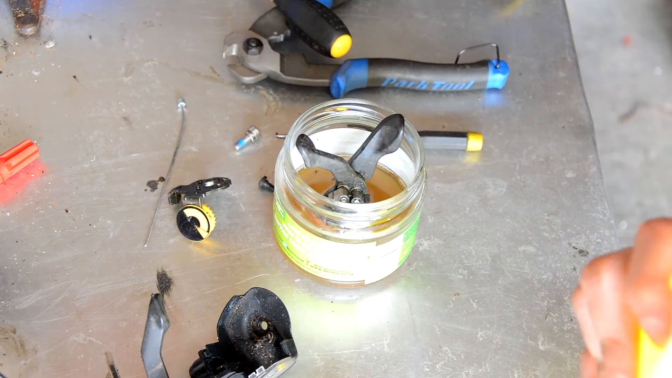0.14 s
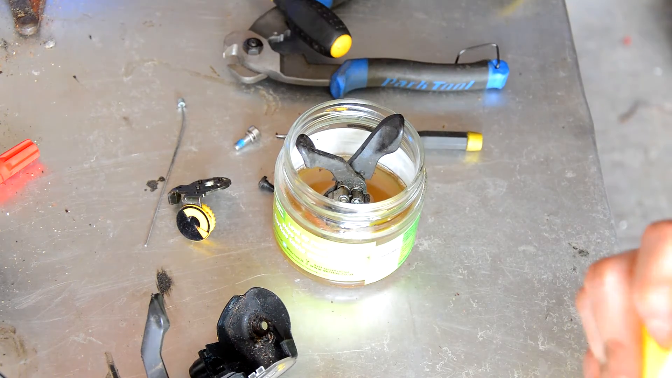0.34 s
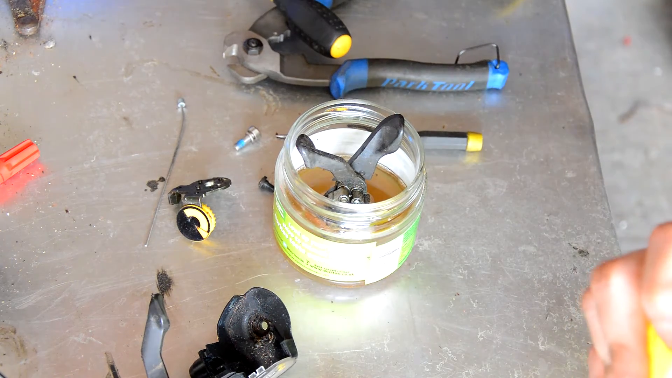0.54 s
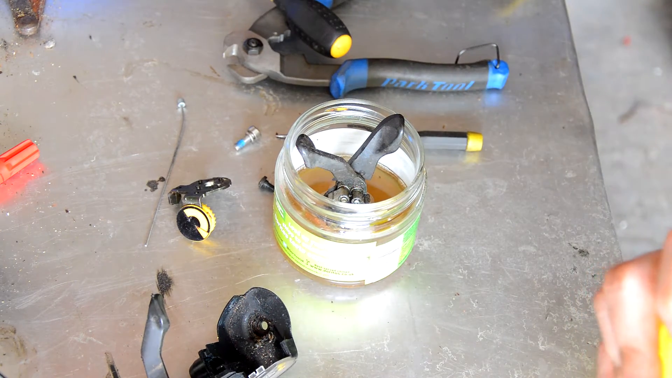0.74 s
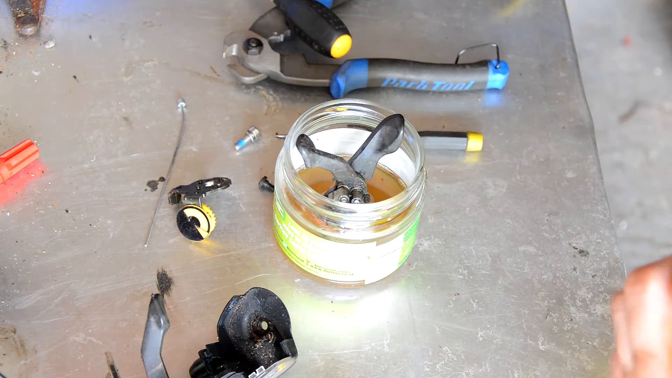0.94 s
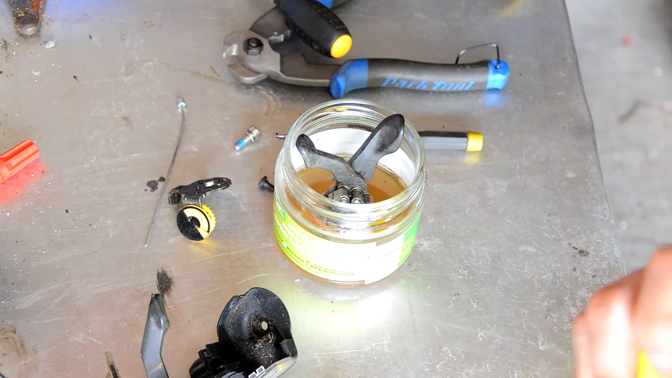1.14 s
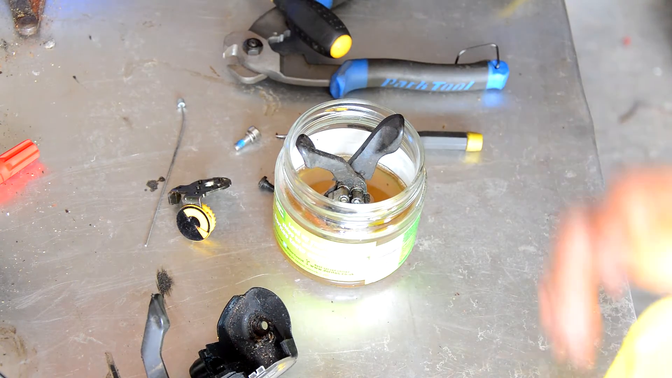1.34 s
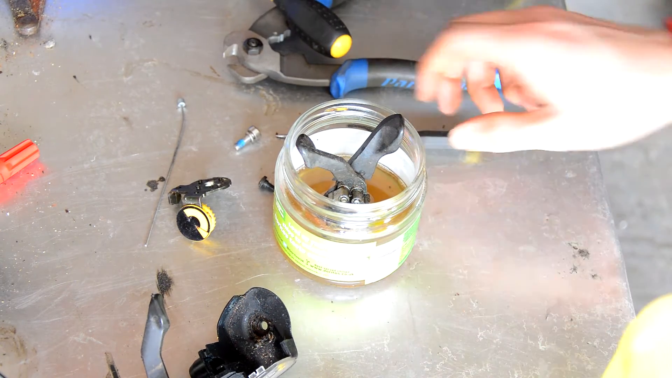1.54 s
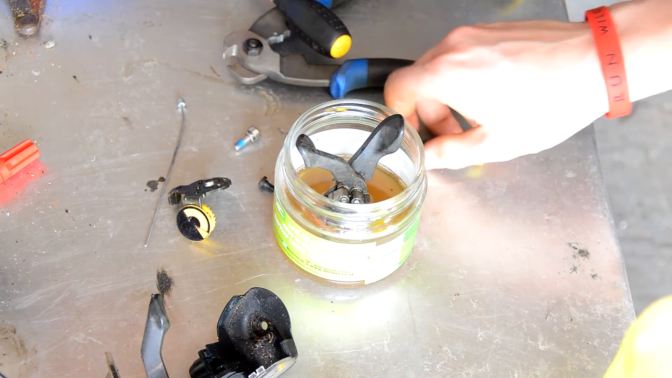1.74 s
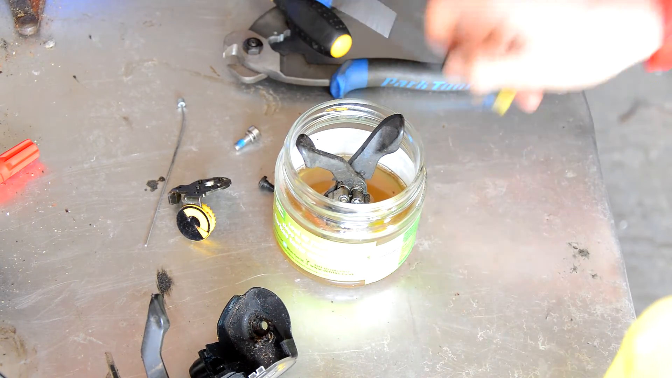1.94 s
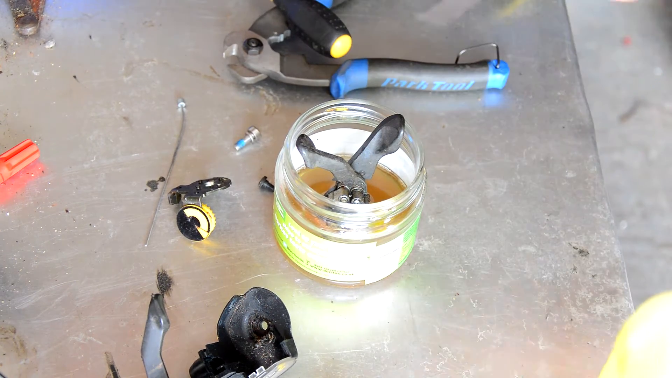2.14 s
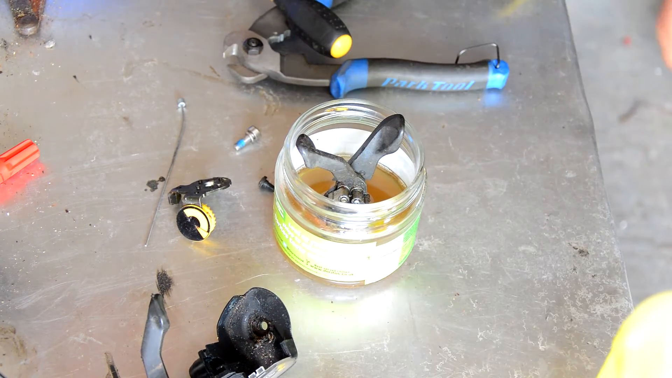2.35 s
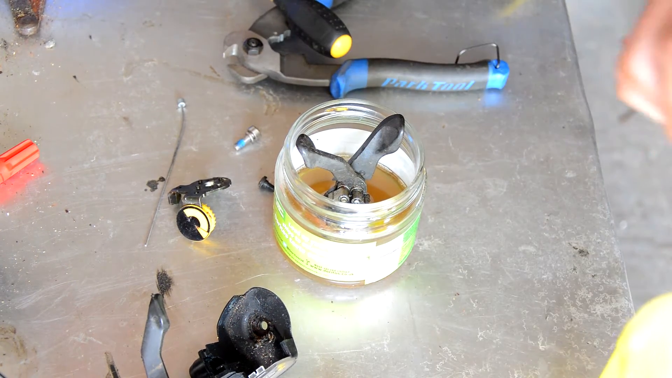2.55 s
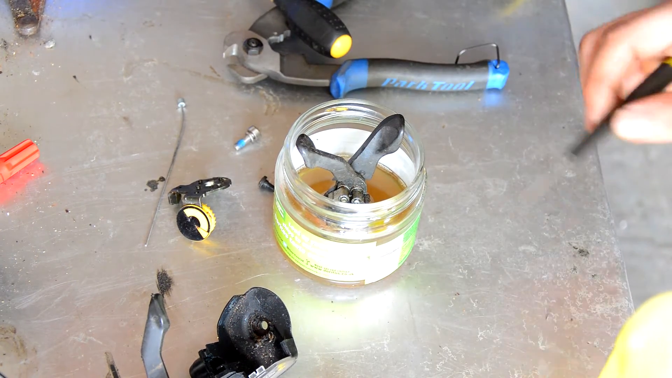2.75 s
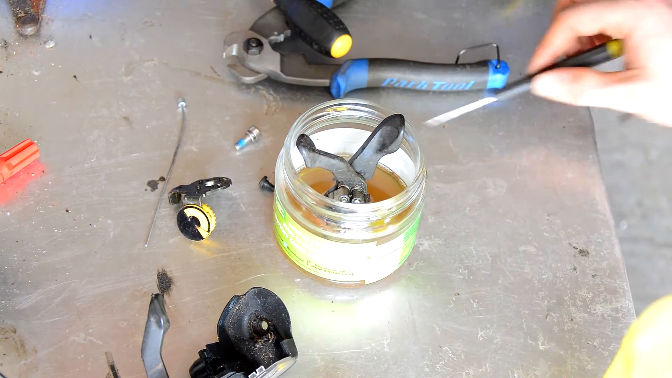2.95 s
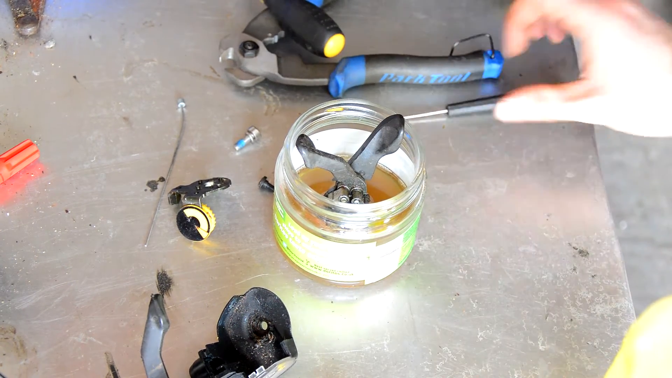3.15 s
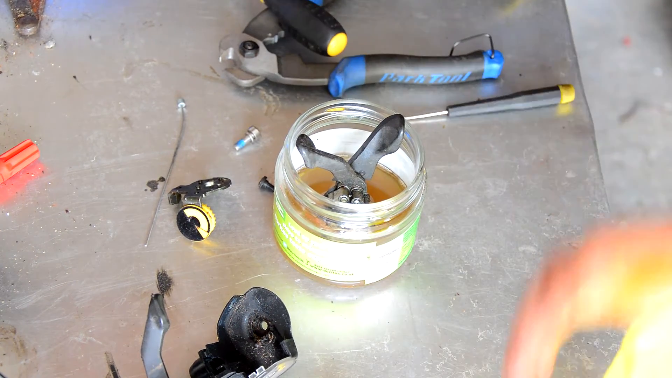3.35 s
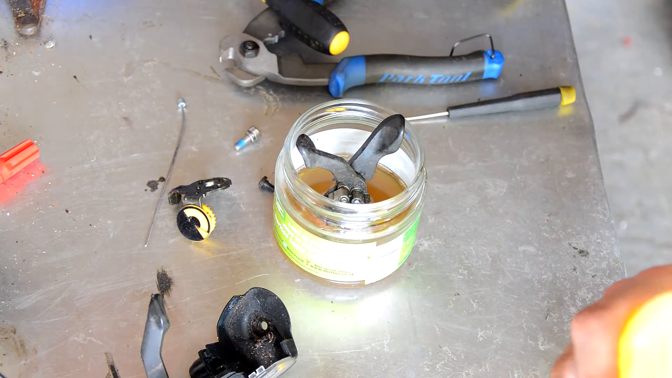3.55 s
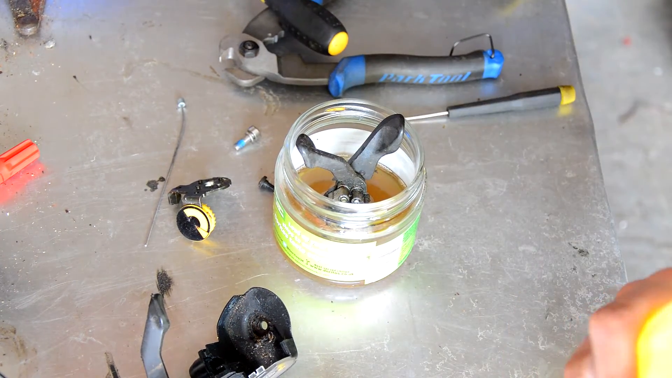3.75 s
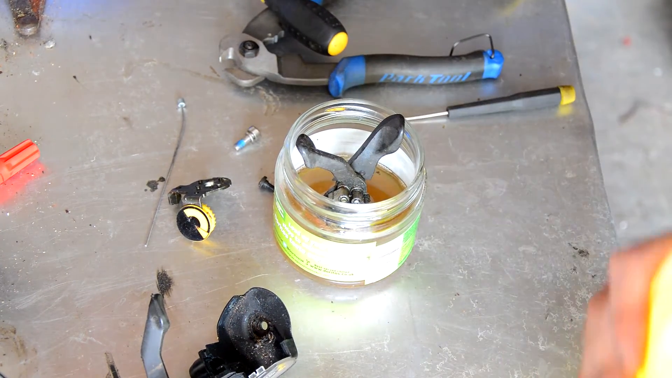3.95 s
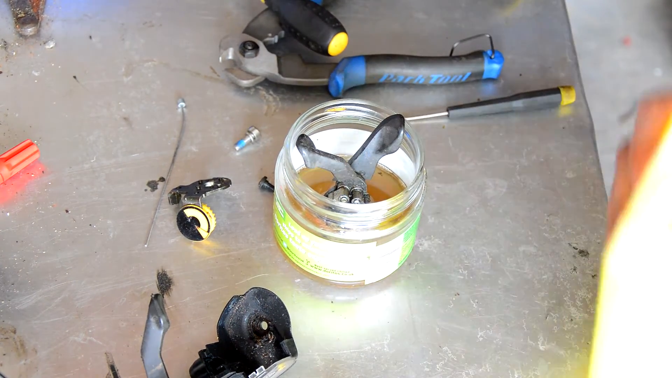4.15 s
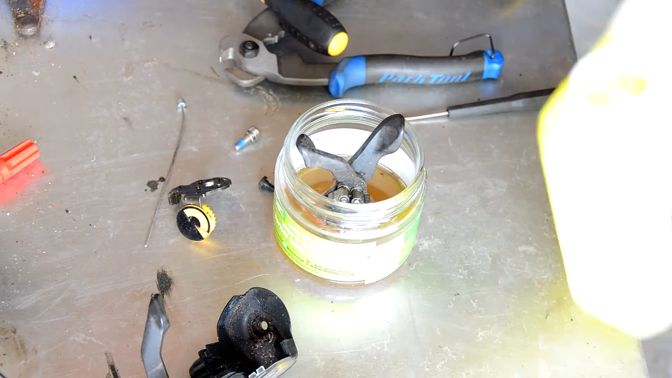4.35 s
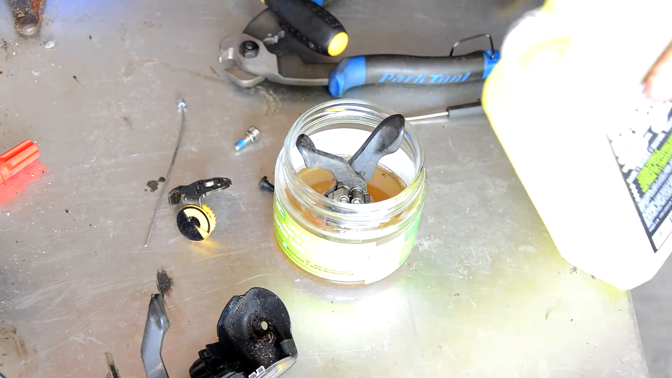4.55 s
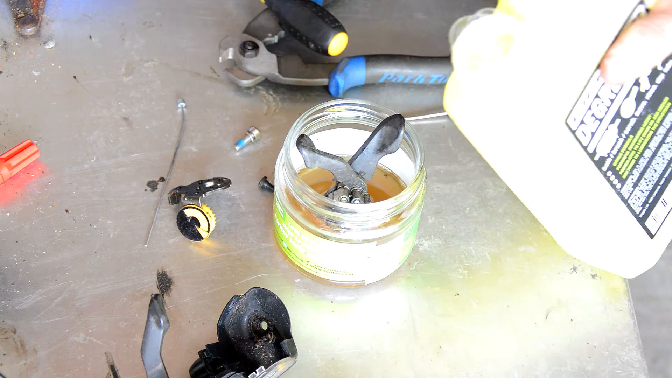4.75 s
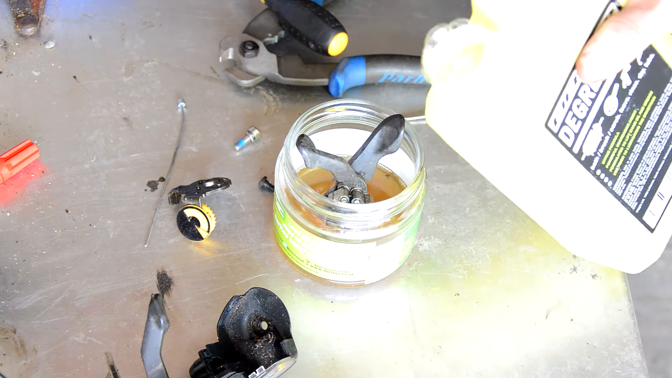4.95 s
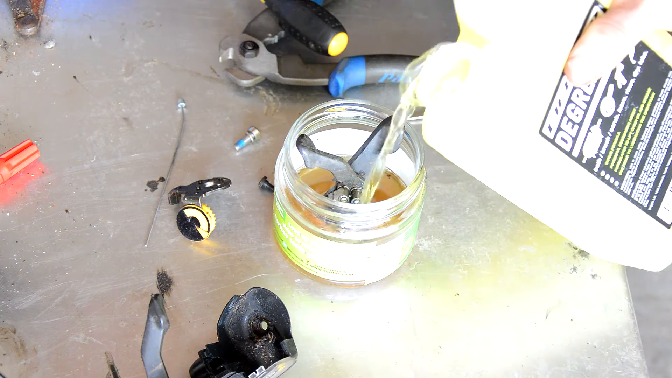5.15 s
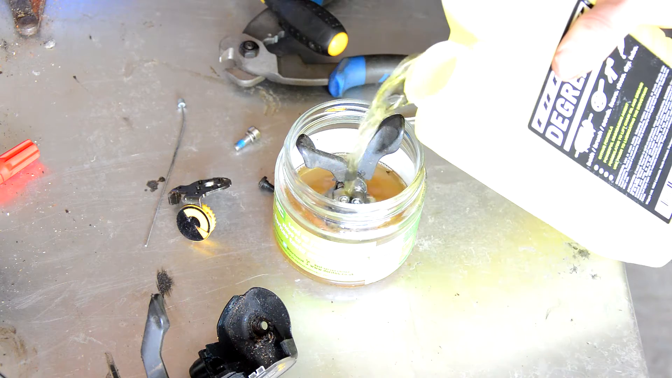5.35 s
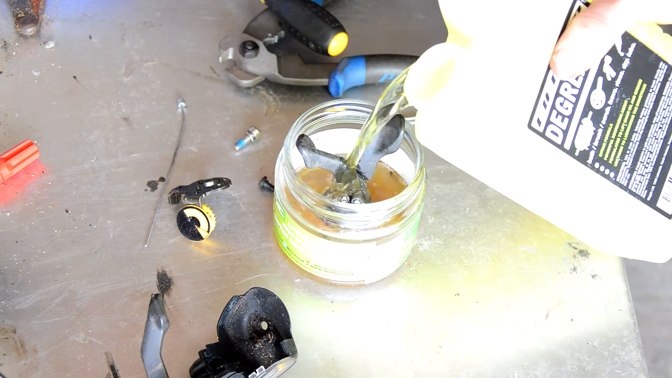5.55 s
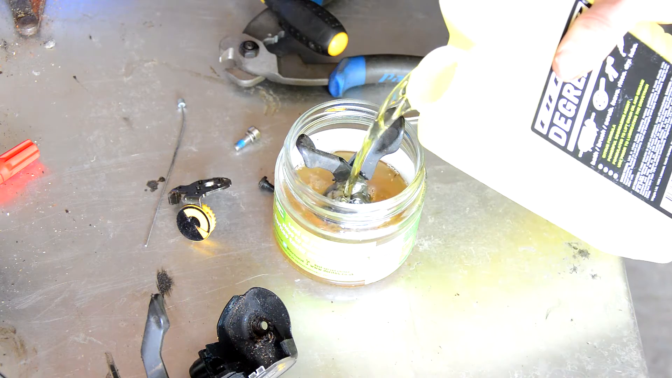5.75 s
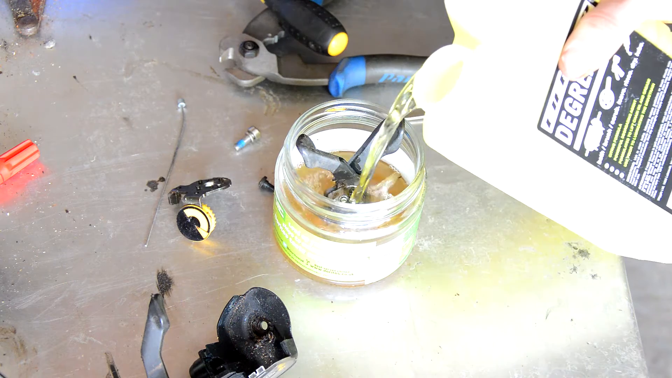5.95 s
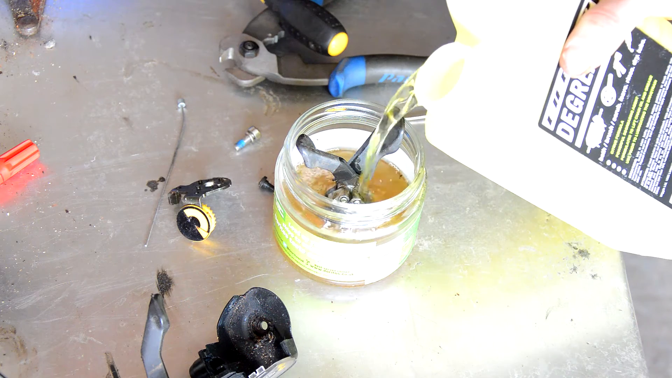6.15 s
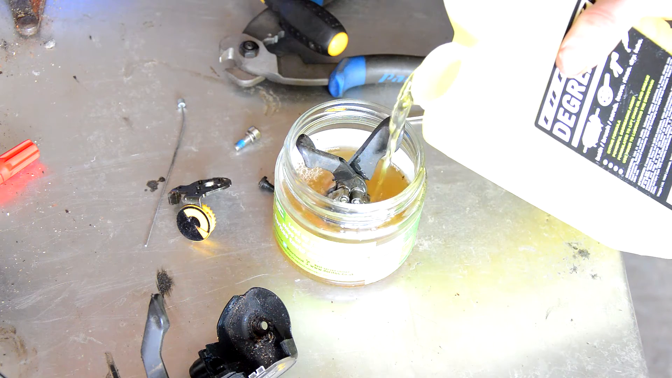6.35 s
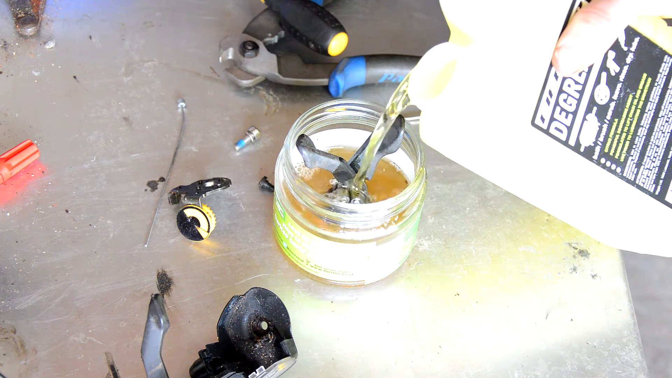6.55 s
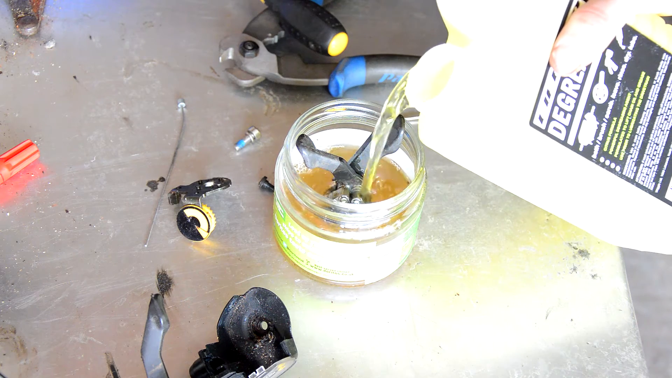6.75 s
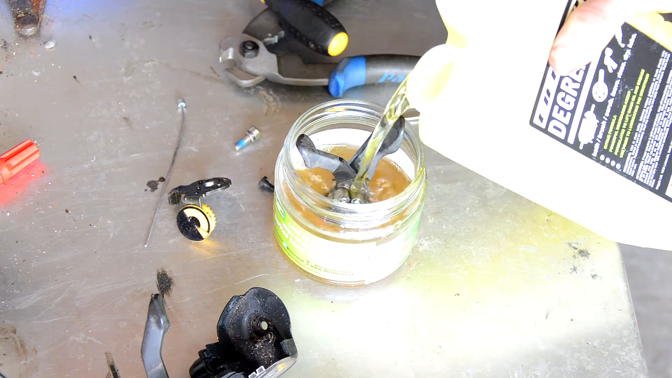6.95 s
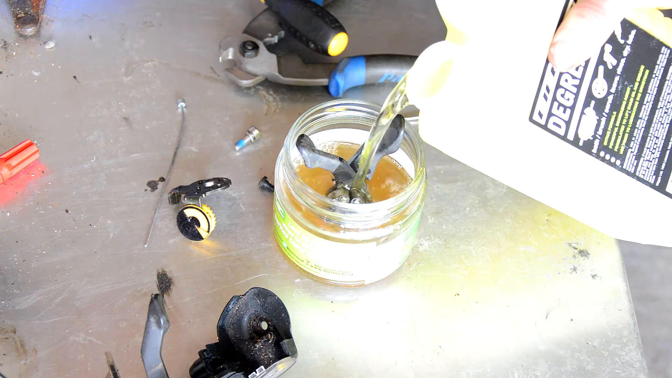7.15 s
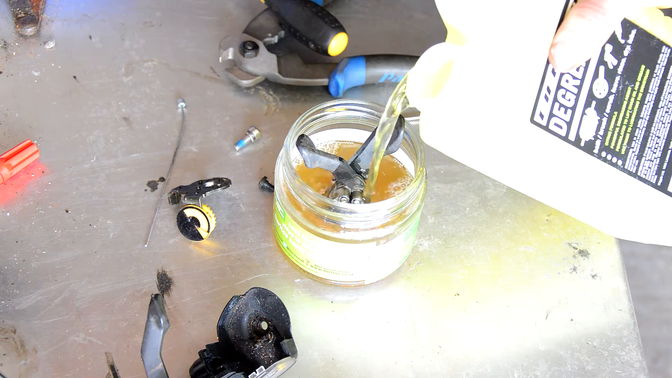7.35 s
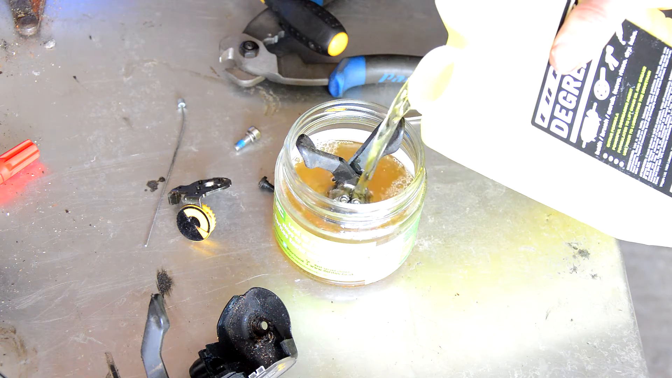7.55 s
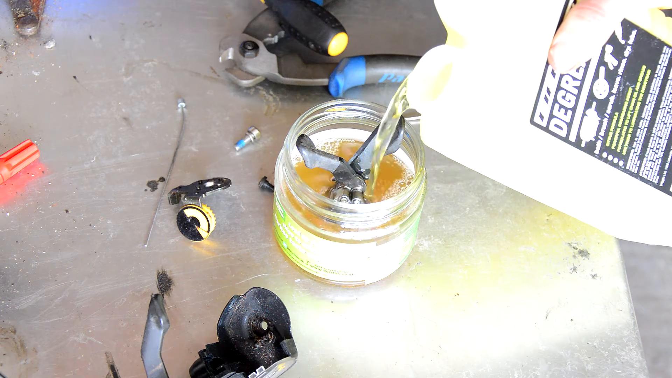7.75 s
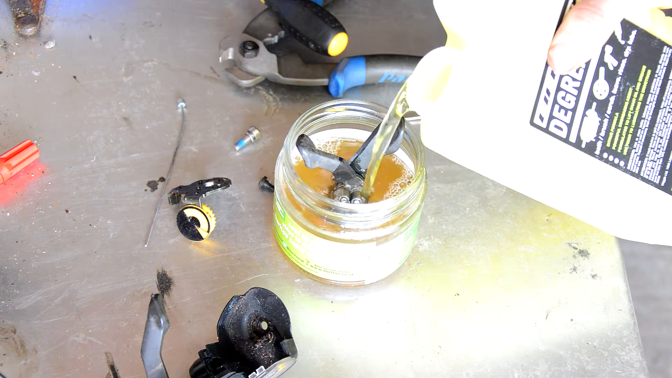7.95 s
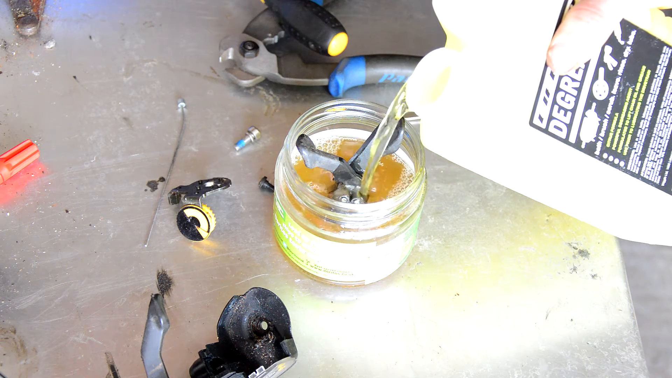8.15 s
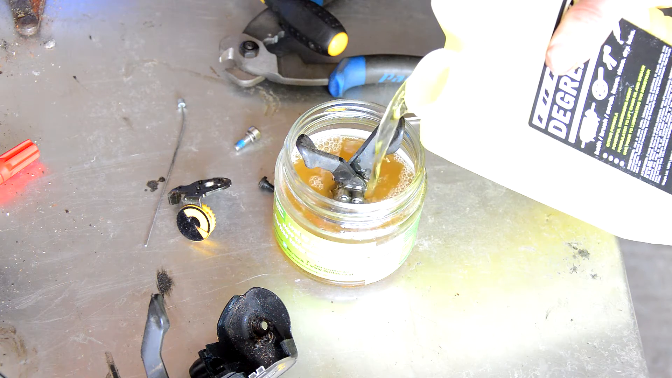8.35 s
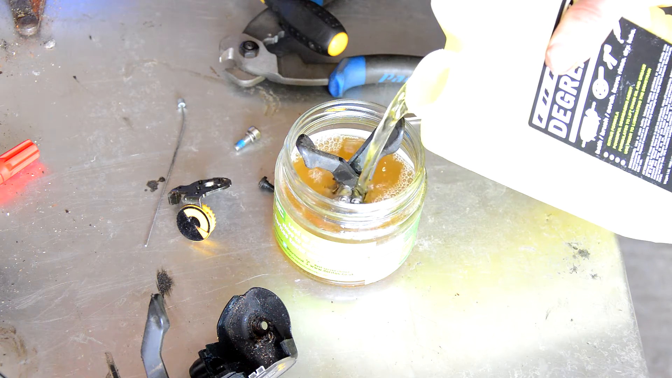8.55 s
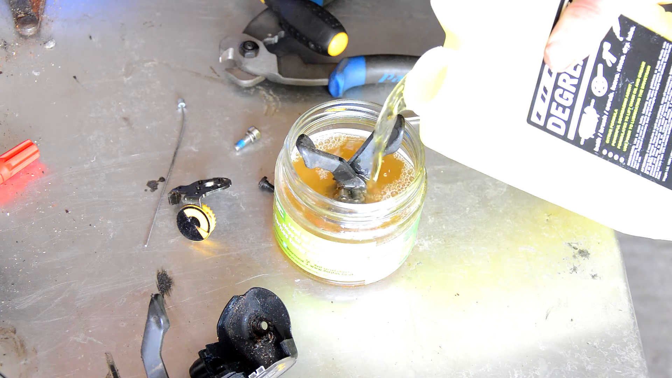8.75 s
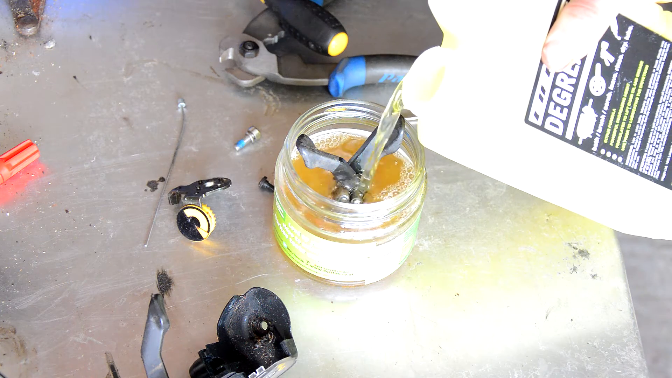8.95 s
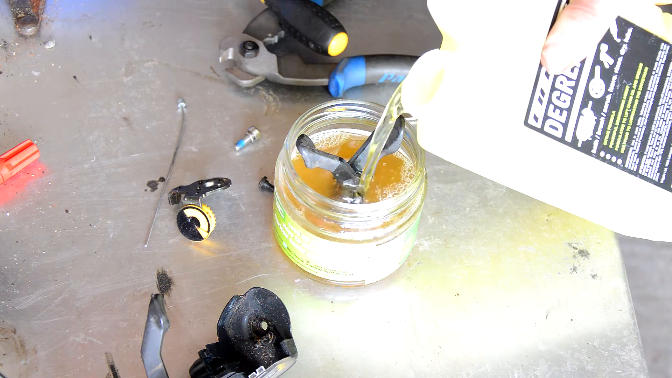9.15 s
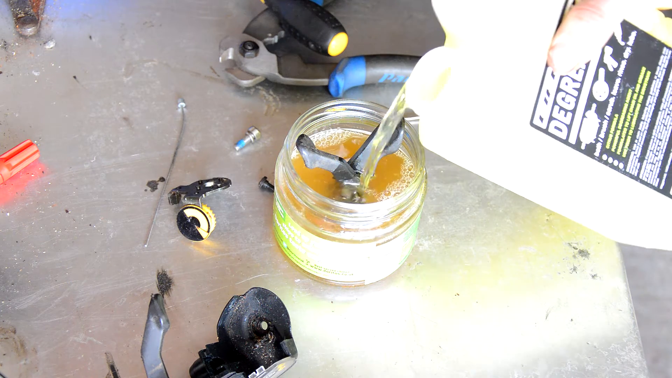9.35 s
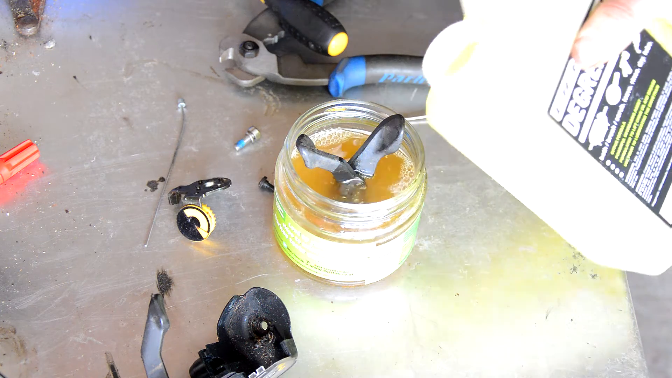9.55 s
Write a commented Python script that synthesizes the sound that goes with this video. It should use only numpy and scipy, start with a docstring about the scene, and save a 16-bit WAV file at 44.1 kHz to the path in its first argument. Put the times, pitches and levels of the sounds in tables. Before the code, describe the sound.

Gritty scuffs and ringing clacks of tools and a jug cap on a hard bench come first, a very loud knock among them, then lighter handling and another sharp double crack. The jug thuds softly, then a thin stream splashes into a small glass jar, crisp and bubbly, uneven, ending in plops. Close microphone, short room echo, quiet rumble and drone behind.

```python
"""Hands at a workbench unscrew a plastic jug and move small tools, close to the microphone; blows ring the bench.
They then pour liquid over metal parts into a glass jar, also close: splats throw spray, bubbles chirp, the jar pings
and all of it shakes the rings of the glass. Rubbing is noisy stick-slip grit, thuds are low sine swings.
Behind lies a quiet workshop: banded air noise, a thin whine, a dull rumble and a low drone that swells."""
import sys
import numpy as np
from scipy import signal
from scipy.io import wavfile
from scipy.ndimage import uniform_filter1d

SR = 44100
rng = np.random.default_rng(int(sys.argv[2]) if len(sys.argv) > 2 else 0)


def wav_out(sig):
    """Save sig, one row per channel (or a flat mono array), as 16-bit PCM at SR to the path in sys.argv[1]."""
    wavfile.write(sys.argv[1], SR, np.round(np.clip(np.atleast_2d(sig).T, -1, 1) * 32767).astype(np.int16))


N = 427329  # samples


def undb(db):
    """Amplitude factor of a level in dB."""
    return np.exp(np.asarray(db) * np.log(10) / 20)


def level(x, db):
    """Bring a signal to an rms level in dB."""
    return x * undb(db) / np.sqrt(np.mean(x ** 2))


def band(x, lo_hz, hi_hz):
    """Keep the sound between two frequencies."""
    sos = signal.butter(2, [lo_hz, min(hi_hz, .45 * SR)], "band", fs=SR, output="sos")
    return signal.sosfilt(sos, x)


def ring(x, hz, width_hz):
    """A resonance with gain 1 at its centre."""
    return signal.lfilter(*signal.iirpeak(hz, hz / width_hz, fs=SR), x)


def steep(x, hz, width_hz):
    """A resonance applied twice, the second wider, for dark valleys around it."""
    return ring(ring(x, hz, width_hz), hz, 2 * width_hz)


def curves(rows):
    """Straight lines over the whole scene through a table whose first column is time."""
    s, *columns = np.transpose(rows)
    return [np.interp(np.arange(N) / SR, s, c) for c in columns]


def add(out, s, x):
    """Mix a sound in at a time in seconds, cut at the end."""
    i = int(s * SR)
    out[i:i + len(x)] += x[:N - i]


def fade(t, t60):
    """Exponential decay that falls 60 dB in t60 seconds."""
    return np.exp(-np.log(1000) * t / t60)


def walk(rate):
    """Random levels held 1 / rate s and slewed twice."""
    k = int(SR / rate)
    held = np.repeat(rng.standard_normal(N // k + 1), k)
    return 0.58 * uniform_filter1d(uniform_filter1d(held, k), k)[:N]


# spectrum of the workshop air, relative: (frequency [Hz], density [dB per Hz])
AIR_SPECTRUM = [(15, -37), (25, -8), (105, 4), (157, 1), (292, -4), (404, -41), (462, -16), (1070, -5),
                (1320, -17.5), (1990, -13), (2400, -26), (2670, -25), (3700, -22.5), (14700, -36),
                (15900, -23)]
AIR_DB = -47.5  # rms of all air bands together
WHINE_HZ, WHINE_DB = 15721, -67.5  # peak level
WHISTLE_HZ, WHISTLE_WIDTH_HZ, WHISTLE_DB = 2693, 230, -65  # a faint steady band in the air noise


def shop():
    """Half-octave bands of air noise swell together and flicker alone, with a faint narrow band and a thin whine."""
    air, swell, points = 0, walk(0.69), np.array(AIR_SPECTRUM)
    for hz in 30 * 2 ** np.arange(0, 9.2, .5):
        density_db = np.interp(np.log(hz), np.log(points[:, 0]), points[:, 1])
        db = density_db + 1.0 * swell + 0.18 * walk(3.2)
        air = air + undb(db) * band(rng.standard_normal(N), hz / 2 ** 0.34, hz * 2 ** 0.19)
    whistle = level(steep(rng.standard_normal(N), WHISTLE_HZ, WHISTLE_WIDTH_HZ), WHISTLE_DB)
    electric_whine = undb(WHINE_DB) * np.sin(2 * np.pi * WHINE_HZ * np.arange(N) / SR)
    return level(air, AIR_DB) + whistle + electric_whine


# murky low-mid rumble, before a slight flicker: (time [s], level [dB])
RUMBLE_LEVELS = [(0.0, -43.5), (0.29, -53.5), (1.21, -53), (1.89, -48.5), (3.67, -53.5), (3.88, -48),
                 (4.34, -53.5), (4.67, -50), (5.02, -55), (5.94, -57), (6.45, -50), (7.34, -52),
                 (8.28, -55.5), (9.07, -59), (9.69, -59)]


def rumble():
    """A dull wash of low-mid noise under the drone that comes and goes."""
    wash = level(band(rng.standard_normal(N), 158, 454), 0)
    return undb(curves(RUMBLE_LEVELS)[0] + 0.66 * walk(5.6)) * wash


# low drone, rms before the wavering: (time [s], upper tone level [dB], lower tone level [dB])
DRONE_LEVELS = [(0.0, -40, -47), (0.13, -79, -53), (0.38, -85, -67), (1.97, -56.5, -47), (4.34, -60, -63.5),
                (4.5, -59, -74), (4.64, -57, -50), (4.91, -46, -73), (5.1, -53, -64), (5.53, -81, -55),
                (5.61, -55, -75), (5.67, -52, -81), (7.4, -39.5, -54), (7.64, -44, -48), (7.72, -42, -61),
                (8.07, -43.5, -51), (8.26, -41, -61), (8.83, -56.5, -58), (9.64, -48, -79),
                (9.69, -51, -66)]
UPPER_HZ, LOWER_HZ = 154, 80.3
UNDERTONE_HZ, UNDERTONE_DB = 136.8, -7  # beats against the upper tone; level against the upper tone's table
THRUM_HZ, THRUM_DB = 37.6, -62.5


def drone():
    """Low sine tones that waver in pitch and level, as from machinery beyond the walls."""
    upper_db, lower_db = curves(DRONE_LEVELS)
    # (level [dB], pitch [Hz], scale of the pitch wavering [Hz])
    tones = ((upper_db, UPPER_HZ, 1.2), (lower_db, LOWER_HZ, 2.3),
             (upper_db + UNDERTONE_DB, UNDERTONE_HZ, 5), (THRUM_DB, THRUM_HZ, 3))
    out = np.zeros(N)
    for db, hz, waver_hz in tones:
        loudness = np.sqrt(2) * undb(db + 6.8 * walk(12))
        out += loudness * np.sin(2 * np.pi * np.cumsum(hz + waver_hz * walk(57)) / SR)
    return out


# narrow hisses and squeaks, rms before their swell and fade:
# (middle [s], length [s], centre [Hz], level [dB])
HISS_EVENTS = [(.372, 0.038, 5000, -59), (.55, 0.34, 4900, -60.5), (.5, 0.41, 6600, -66),
               (3.084, 0.067, 2930, -35), (4.34, 0.091, 3280, -59), (5.105, 0.095, 4200, -55.5),
               (5.904, 0.11, 4200, -53), (7.783, 0.089, 3540, -57), (8.354, 0.063, 4940, -56)]
HISS_WIDTH_HZ = 390


def hisses():
    """Narrow bands of noise that swell and fade, unevenly."""
    out = np.zeros(N)
    for s, length_s, hz, db in HISS_EVENTS:
        k = int(length_s * SR)
        hiss = level(steep(rng.standard_normal(k), hz, HISS_WIDTH_HZ), db)
        add(out, s - length_s / 2, hiss * np.hanning(k) ** .5)
    return out * undb(4 * walk(45))


def bubble(hz, t60, rise):
    """A gas pocket rings and climbs in pitch as it nears the surface."""
    t = np.arange(int(t60 * SR) + 8) / SR
    tone = np.sin(2 * np.pi * hz * t * (1 + rise * t / t60))
    return tone * fade(t, t60) * (1 - np.exp(-t * hz / 2.0))


def splat(hz, t60):
    """A drop lands: a wide tick, a spray of noise around the pitch, and a cluster of short bubbles under it."""
    t = np.arange(int(1.5 * t60 * SR)) / SR
    cluster = np.zeros(SR // 5)
    add(cluster, 0, bubble(hz, 0.74 * t60, rise=0.014))
    for late, pitch, size in rng.random((3, 3)):  # quieter ones follow
        follower = bubble(hz * 2 ** (.6 * (pitch - .5)), 0.5 * t60, rise=0.05)
        add(cluster, 0.019 * late, undb(-6.5 - 10 * size) * follower)
    noise = rng.standard_normal(len(t))
    tick = band(band(noise * fade(t, 0.11 * t60), 3400, 11200), 3400, 11200)
    spray = steep(noise * fade(t, 0.62 * t60) * (1 - np.exp(-t / 0.00052)), hz, 0.21 * hz)
    return undb(-10) * cluster[:len(t)] + undb(-12) * tick + spray


PLOP_DB, PLOP_T60_S = -9.5, 0.017  # the wide splash that opens each bigger bubble or ping


def plop(hz, t60):
    """A wide wet splash, then a tone that climbs in pitch and rings unevenly: a bigger bubble or a ping."""
    tone = bubble(hz, t60, rise=0.053)
    t = np.arange(len(tone)) / SR
    noise = rng.standard_normal((2, len(t))) * (1 - np.exp(-t / 0.0021))
    splash = band(noise[0] * fade(t, PLOP_T60_S), .6 * hz, 1.7 * hz)
    rough = steep(noise[1], hz, 0.21 * hz) * fade(t, t60)
    splash *= undb(PLOP_DB) / np.abs(splash).max()
    return tone + splash + undb(-5) * rough / np.abs(rough).max()


def swarm(per_s, centre_hz, octaves, spread_db, fewest_cycles, more_cycles):
    """Bubbles born at random while the liquid runs; most are small and brief."""
    out, start = np.zeros(N), JET_FLOW[0][0]
    running_s = N / SR - start
    for when, pitch, other, size, cycles in rng.random((int(per_s * running_s), 5)):
        hz = centre_hz * 2 ** (octaves * (pitch + other - 1))
        t60 = (fewest_cycles + more_cycles * cycles ** 2) / hz
        add(out, start + when * running_s, undb(spread_db * size ** 3) * bubble(hz, t60, rise=0.017))
    return out


# steady strength of the jet: (time [s], fizz level [dB])
JET_FLOW = [(5.181, -63), (5.25, -55.5), (5.75, -55), (5.85, -60), (6.12, -61.5), (6.27, -59.5), (6.9, -54),
            (7.02, -63), (7.12, -58), (7.7, -62), (8.05, -56.5), (8.38, -60), (8.45, -62.5), (9.25, -64.5),
            (9.55, -59), (9.64, -70)]
# the fizz each splat throws up, level against the splat's peak
SPRAY_DB, SPRAY_SWELL_S, SPRAY_T60_S = -17.5, 0.0053, 0.061


def jet():
    """Strength of the fizz: the steady flow, and a quick puff of spray around every splat."""
    out, t = undb(curves(JET_FLOW)[0]), np.arange(int(.2 * SR)) / SR
    puff = np.concatenate([np.linspace(0, 1, int(SPRAY_SWELL_S * SR)), fade(t, SPRAY_T60_S)])
    for s, db, _ in DROP_SPLATS:
        add(out, s - SPRAY_SWELL_S, undb(db + SPRAY_DB) * puff)
    return out


# rings of the glass jar: (first pitch [Hz], pitch once the parts are covered [Hz], width [Hz], gain [dB])
JAR_RINGS = [(1066, 1124, 84, 3), (2520, 2740, 85, -0.5), (4300, 4350, 79, -6.5), (5770, 5950, 37, -8.5)]
COVERED_S = (5, 6.5)  # the rings cross over between these times


def jar(shake):
    """The glass rings, a little higher once the liquid covers the parts."""
    late = np.interp(np.arange(N) / SR, COVERED_S, (0, 1))
    out = np.zeros(N)
    for early_hz, late_hz, width, db in JAR_RINGS:
        out += undb(db) * (ring(shake * (1 - late), early_hz, width) + ring(shake * late, late_hz, width))
    return out


# the clearest splats, before the glass adds its ring: (time [s], peak level [dB], pitch of the trapped bubble [Hz])
DROP_SPLATS = [(5.2085, -27.5, 9400), (5.232, -30.5, 4870), (5.266, -27, 8350), (5.2852, -25.5, 8930),
               (5.296, -34, 5900), (5.364, -34, 5600), (5.3675, -34, 3860), (5.376, -30, 4580),
               (5.42, -46, 9050), (5.45, -43, 8740), (5.475, -38, 7160), (5.4886, -29, 5800),
               (5.503, -30, 4480), (5.521, -29, 8000), (5.5387, -27.5, 9000), (5.5517, -28.5, 10000),
               (5.5772, -39, 9700), (5.6072, -42, 10100), (5.6424, -39, 8360), (5.6635, -36.5, 4340),
               (5.695, -34, 5270), (5.7087, -31, 6440), (5.7247, -30, 4050), (5.781, -40.5, 10700),
               (5.9664, -44, 4330), (5.9768, -43, 6100), (6.214, -37, 7300), (6.225, -39, 5300),
               (6.2495, -32, 6240), (6.265, -30.5, 9500), (6.2866, -30, 7400), (6.36, -44, 4500),
               (6.3949, -40, 7260), (6.4492, -42, 8910), (6.497, -40, 7430), (6.537, -39.5, 4200),
               (6.551, -45, 7800), (6.576, -42, 6200), (6.592, -39, 4350), (6.6605, -34, 8160),
               (6.695, -35.5, 7750), (6.7321, -40, 8620), (6.753, -34, 9800), (6.772, -38, 5330),
               (6.8009, -37, 10100), (6.8493, -36, 5930), (6.902, -28.5, 7130), (7.0935, -33, 8100),
               (7.15, -38, 9150), (7.21, -32.5, 9360), (7.286, -36, 10900), (7.3493, -35, 5930),
               (7.5025, -24, 10800), (7.504, -30.5, 5950), (7.5597, -33.5, 7600), (7.5877, -40, 8640),
               (7.613, -43, 8700), (7.6505, -38.5, 8880), (7.814, -38, 4320), (7.8314, -38, 8900),
               (7.928, -36, 8100), (8.008, -37, 5550), (8.0466, -39, 5930), (8.087, -39, 4400),
               (8.306, -43, 8200), (8.7828, -34.5, 8550), (9.0885, -34.5, 5650), (9.232, -37, 5900),
               (9.5424, -40, 7600), (9.55, -35, 7460), (9.57, -38, 4600), (9.586, -27.5, 8630),
               (9.588, -37, 4700)]
SPLAT_T60_S = 0.027  # each part of a splat takes a share of this
# bigger bubbles, and long glassy pings of the jar near 2.5 kHz, level of the tone alone:
# (time [s], nominal peak [dB], pitch [Hz], t60 [s])
BUBBLES_AND_PINGS = [(5.21, -36, 2514, 0.051), (5.2728, -36.5, 2450, 0.054), (5.3358, -47, 2440, 0.05),
                     (5.3667, -37, 1930, 0.031), (5.374, -28, 2484, 0.044), (5.534, -37, 1380, 0.024),
                     (5.5495, -32.5, 1100, 0.029), (5.671, -37.5, 1280, 0.034), (5.699, -43.5, 2510, 0.094),
                     (5.7792, -37, 1730, 0.035), (5.979, -42.5, 2630, 0.049), (6.3, -42, 2580, 0.03),
                     (6.376, -41, 1132, 0.045), (6.5068, -36, 1054, 0.019), (6.55, -45, 1142, 0.061),
                     (6.625, -45, 1130, 0.059), (6.747, -36, 2656, 0.037), (6.769, -38, 1050, 0.03),
                     (6.902, -36, 1020, 0.018), (7.153, -37, 1270, 0.022), (7.814, -39, 1040, 0.03),
                     (7.8312, -27.5, 1260, 0.013), (7.892, -35.5, 1640, 0.036), (7.965, -42, 2800, 0.024),
                     (8.0272, -39, 2140, 0.024), (8.0676, -32.5, 1740, 0.036), (8.368, -35.5, 1630, 0.026),
                     (9.542, -24.5, 1260, 0.027), (9.556, -38, 2180, 0.023), (9.6, -25, 1526, 0.028)]
FIZZ_PER_S, FIZZ_HZ, FIZZ_OCTAVES = 1000, 7360, 0.95
GURGLES_PER_S, GURGLE_DB = 91, -45  # gain at a surge of 1


def pour():
    """Splats, bubbles and pings over a dense swarm of tiny grains; all of them shake the glass."""
    single = np.zeros(N)
    for s, db, hz in DROP_SPLATS:
        drop = splat(hz, SPLAT_T60_S)
        add(single, s, undb(db) * drop / np.abs(drop).max())
    for s, db, hz, t60 in BUBBLES_AND_PINGS:
        add(single, s, undb(db) * plop(hz, t60))

    grains = swarm(FIZZ_PER_S, FIZZ_HZ, FIZZ_OCTAVES, 13, 6.6, 126)
    mist = sum(undb(4.7 * walk(80)) * steep(rng.standard_normal(N), hz, hz / 4)
               for hz in (3440, 4720, 5530, 7860, 9200, 10140))
    fizz = (level(grains, 0) + level(mist, 0.25)) * undb(10 * walk(83))  # the jet breaks up in bursts
    fizz /= np.sqrt(uniform_filter1d(fizz ** 2, SR // 12) + 1e-3)  # even out the slower swells
    flow = jet()
    fizz *= flow

    surge = (uniform_filter1d(flow, SR // 4) / undb(-54)) ** 1.16
    gurgle = undb(GURGLE_DB) * surge * swarm(GURGLES_PER_S, 1670, 1.02, 10.4, 12.4, 28)
    flowing = np.arange(N) > JET_FLOW[0][0] * SR
    drumming = level(band(rng.standard_normal(N), 460, 13800), -47.5)
    stream = flowing * drumming * surge * undb(15.0 * walk(25))  # the jet drums on the glass
    wet = single + fizz + gurgle
    return wet + jar(wet + stream)  # the stream is heard only through the glass


# the heavy jug set down or bumped, felt through the bench: (time [s], peak level [dB])
JUG_THUDS = [(1.361, -29.5), (3.722, -36), (4.632, -34)]
THUD_HZ, THUD_T60_S = 77, 0.15


def thuds():
    """A short low swing of the bench top."""
    out, t = np.zeros(N), np.arange(int(.3 * SR)) / SR
    for s, db in JUG_THUDS:
        add(out, s, undb(db) * np.sin(2 * np.pi * THUD_HZ * t) * fade(t, THUD_T60_S))
    return out


# modes of the bench, rung by rubs and blows alike: (frequency [Hz], width [Hz], gain [dB])
BENCH_MODES = [(436, 40, -5), (851, 58, 3), (996, 120, -5), (1096, 75, -8), (1487, 120, -18),
               (2058, 42, -7.5), (2510, 110, -13), (2740, 56, -17), (3110, 48, -12)]
# hands rubbing and sliding things, nominal levels before the uneven touch:
# (loudest at [s], swell [s], die-away [s], dull part [dB], bright part [dB], bright centre [Hz])
HAND_RUBS = [(0.075, 0.13, 0.022, -37, -33, 7500), (0.112, 0.05, 0.035, -37, -30, 5600),
             (0.2, 0.086, 0.062, -45, -43.5, 6300), (0.5, 0.43, 0.42, -50.5, -56, 7500),
             (1.085, 0.018, 0.14, -62, -48, 6450), (1.182, 0.09, 0.057, -33, -36.5, 5800),
             (1.391, 0.053, 0.056, -39.5, -37, 7100), (1.769, 0.01, 0.13, -30.5, -37.5, 5900),
             (2.3, 0.25, 0.16, -51.5, -60, 6040), (2.41, 0.11, 0.067, -62, -51, 7500),
             (2.568, 0.16, 0.12, -54, -64.5, 6300), (2.766, 0.14, 0.064, -47, -48, 5570),
             (2.91, 0.011, .02, -51, -39, 6650), (2.962, 0.045, 0.029, -43, -41.5, 6860),
             (3.0, .02, 0.015, -48, -41, 7000), (3.063, 0.0084, 0.071, -32, -25.5, 4420),
             (3.099, 0.032, 0.026, -56, -29, 6400), (3.45, 0.93, .4, -49, -51, 5560),
             (3.59, 0.11, 0.14, -54, -62, 6090), (3.89, 0.079, 0.089, -55, -43.5, 6500),
             (3.942, 0.091, 0.051, -34.5, -55, 5890), (4.504, 0.019, 0.034, -40, -39, 9400),
             (4.627, 0.015, 0.027, -61, -30.5, 9000), (4.66, 0.061, 0.094, -39.5, -59, 6770),
             (4.73, 0.011, 0.056, -46.5, -45, 8000), (4.834, 0.035, 0.09, -48, -47.5, 8000),
             (5.0, 0.017, 0.029, -46, -50, 5000), (9.37, 0.018, 0.015, -44, -69, 6780),
             (9.468, 0.037, .06, -35, -51, 5770)]
RUB_SPAN_DB = 20  # level change over the swell and over the die-away


def handling():
    """Stick-slip grit: dense uneven clicks, dull through the bench and bright from the plastic."""
    grit = rng.standard_normal((2, N)) * undb(12.4 * rng.random((2, N)) ** 6)
    modes = sum(undb(db) * ring(grit[0], hz, width) for hz, width, db in BENCH_MODES)
    dull = band(grit[0], 490, 1340) + undb(9.0) * modes
    dull = level(band(dull, 330, 2740), 0)
    centres = 4000 * 2 ** np.arange(0, 1.7, .25)
    shades = np.array([level(steep(grit[1], hz, hz / 9), -7.5) for hz in centres])
    out, t = np.zeros(N), np.arange(N) / SR
    for s, swell_s, die_s, dull_db, bright_db, bright_hz in HAND_RUBS:
        near = slice(max(int((s - 2 * swell_s) * SR), 0), int((s + 2 * die_s) * SR))
        away = np.maximum((s - t[near]) / swell_s, (t[near] - s) / die_s)
        touch = undb(-RUB_SPAN_DB * away ** 1.23)  # rounded top
        shade_db = -12 * abs(np.log2(centres / bright_hz)) - 10 * (centres > 10500)
        bright = undb(shade_db) @ shades[:, near]
        out[near] += touch * (undb(dull_db) * dull[near] + undb(bright_db) * bright)
    return out * undb(5 * walk(60))


# tools and jug cap striking, as they leave the bench, before the walls answer:
# (time [s], body peak [dB], body centre [Hz], crack above body [dB], crack centre [Hz],
#  snap above body [dB], snap centre [Hz], ring length, of which each part takes a share [s])
TOOL_KNOCKS = [(0.008, -27, 900, 6.5, 2320, 13.5, 5150, 0.054),
               (0.041, -15, 1030, 1, 3190, -10, 4520, 0.077),
               (0.047, -18.5, 1010, 6.5, 2770, 0, 4540, 0.079),
               (0.063, -23, 1020, 7, 3200, 23.5, 10200, 0.092), (0.102, -28, 900, -3, 2200, 4, 4900, 0.04),
               (0.1127, -15, 910, -14, 2240, -0.5, 4900, 0.035),
               (0.178, -34.5, 1100, -6, 1500, -12, 5000, 0.04),
               (0.258, -44, 1740, 22.5, 2120, -21, 5960, 0.047), (0.524, -44, 900, 6, 2620, 6, 4900, 0.03),
               (0.712, 1, 756, 5, 2700, -0.5, 7700, 0.079), (0.754, -14.5, 834, -4, 2250, -13, 5050, 0.16),
               (0.781, -6.5, 1250, -13, 2460, -9, 5970, 0.23), (0.794, -22, 840, -1, 2950, 10, 5400, 0.23),
               (0.812, -13, 830, 3, 1870, -11, 5070, 0.1), (0.966, -38, 816, -16, 2180, -4, 4770, 0.17),
               (1.081, -34.5, 1010, 0, 2250, -8, 6220, 0.14),
               (1.167, -19.5, 930, -2.5, 2630, 5, 5500, 0.14), (1.26, -33, 845, -10, 2030, 3, 7600, 0.18),
               (1.353, -26.5, 850, -36, 2090, -28, 8330, 0.082),
               (1.71, -19, 790, -32, 2240, -38, 6110, 0.03),
               (1.768, -15.5, 950, -27, 2090, -4, 5540, 0.067),
               (1.825, -21, 845, -19, 2180, -2, 6400, 0.11),
               (1.882, -21.5, 1030, -10, 2020, -17, 4970, 0.029),
               (1.912, -34, 1000, -17, 2000, -19, 5000, 0.044),
               (2.024, -11, 900, 1.5, 2270, -6, 4870, 0.058),
               (2.456, -34.5, 885, 1.5, 2400, -11, 5740, 0.063),
               (2.575, -32, 816, 0, 2380, -20, 4920, 0.065), (2.769, -42.5, 900, 5, 2120, 13, 5530, 0.074),
               (2.952, -27.5, 800, 0.5, 2130, 7, 4860, 0.08),
               (3.047, -12.5, 1320, -1, 2930, 7.5, 7500, 0.19),
               (3.193, 3.5, 1020, 4, 1550, 3.5, 7800, 0.053), (3.1997, -2, 960, -4, 1500, 1, 6040, 0.053),
               (3.59, -32, 767, -14, 4490, 9, 4800, 0.07), (3.72, -12.5, 910, 4, 2300, 18.5, 5040, 0.047),
               (4.063, -49, 900, -22, 2200, 17, 8000, 0.043), (4.078, -51, 900, -20, 2200, 16, 7500, 0.044),
               (4.495, -25, 960, -0.5, 1920, 20, 9400, 0.15),
               (4.632, -14.5, 990, -40, 2560, -8, 8600, 0.069)]
BODY_WIDTH_HZ = 270
THUMP_DB, LOW_CLICK_DB = -18.5, -12.5  # gains of the thump and of a short low click beside the body
CRACK_WIDTH_HZ, CRACK_WIDENS = 1500, .3  # width for a 0 dB blow; dB of width per dB of blow


def knocks():
    """Each blow rattles the bench modes near its body pitch, with a crack of the tool and a short bright snap."""
    out, t = np.zeros(N), np.arange(SR // 4) / SR
    for s, peak_db, body_hz, crack_db, crack_hz, snap_db, snap_hz, t60 in TOOL_KNOCKS:
        rattle = rng.standard_normal((3, len(t)))  # the contact chatters while it dies away
        lumps_db = 5 * np.repeat(rng.standard_normal(len(t) // 128 + 1), 128)[:len(t)]
        rattle *= undb(lumps_db)
        rattle[:, 0] += 14  # the first touch is the hardest
        push, tap, flick = (r * fade(t, share * t60) for r, share in zip(rattle, (.8, .45, .55)))
        contact_s = 0.000091 * undb(-.8 * crack_db)  # a dull blow is a soft, slow contact
        push = push * (1 - np.exp(-t / contact_s))

        body = sum(undb(db - 13 * abs(np.log2(hz / body_hz))) * ring(push, hz, width)
                   for hz, width, db in BENCH_MODES)
        body += undb(-4.5) * ring(push, body_hz, BODY_WIDTH_HZ)
        body = band(band(body, 674, 3860), 674, 3860)
        body += undb(THUMP_DB) * band(push, 307, 520)
        body += undb(LOW_CLICK_DB) * band(push * fade(t, 0.0095), 45, 310)

        crack_width_hz = CRACK_WIDTH_HZ * undb(CRACK_WIDENS * peak_db)
        crack = band(steep(tap, crack_hz, crack_width_hz), 1040, 11600)
        clatter = band(band(tap, 1430, 7000), 1560, 7200)
        crack += undb(-5.0 + 0.4 * peak_db) * clatter  # hard blows clatter widely
        snap = steep(flick, snap_hz, 3200) + undb(-6.5) * band(flick, 4900, 10160)

        parts = ((body, 0), (crack, crack_db), (snap, snap_db))
        add(out, s, undb(peak_db) * sum(undb(db) * x / np.abs(x).max() for x, db in parts))
    return out


ROOM_T60_S, ROOM_DB = 0.21, -12  # decay at 1 kHz; level of the echo


def room(near):
    """The workshop walls answer with a short wash of noise bands, whose treble dies first."""
    t = np.arange(int(.5 * SR)) / SR
    walls = np.zeros(len(t))
    # (octave centre [Hz], gain [dB])
    for hz, db in ((500, 3.5), (1000, -4.0), (2000, -0.5), (4000, -2.5), (8000, -1.0)):
        octave = band(rng.standard_normal(len(t)), hz / 2 ** .5, hz * 2 ** .5)
        walls += octave * fade(t, ROOM_T60_S * (1000 / hz) ** 0.18) * undb(db)
    walls *= t > .004  # silent for the first 4 ms
    return undb(ROOM_DB) * signal.fftconvolve(near, walls / np.sqrt(np.sum(walls ** 2)))[:N]


def scene():
    """Knocks and pouring sound close by and wake the walls; hands and background lie around them."""
    near = knocks() + pour()
    hands = handling() + thuds() + hisses()
    background = drone() + rumble() + shop()
    return (near + room(near) + hands + background)[None]


TOP_HZ = 16000


def record(dry):
    """At the microphone the loudest blows clip, and the top is cut."""
    top_cut = signal.ellip(10, .2, 80, TOP_HZ, fs=SR, output="sos")
    return signal.sosfilt(top_cut, np.clip(dry, -1, 1))


dry = scene()
out = record(dry)
wav_out(out)
```